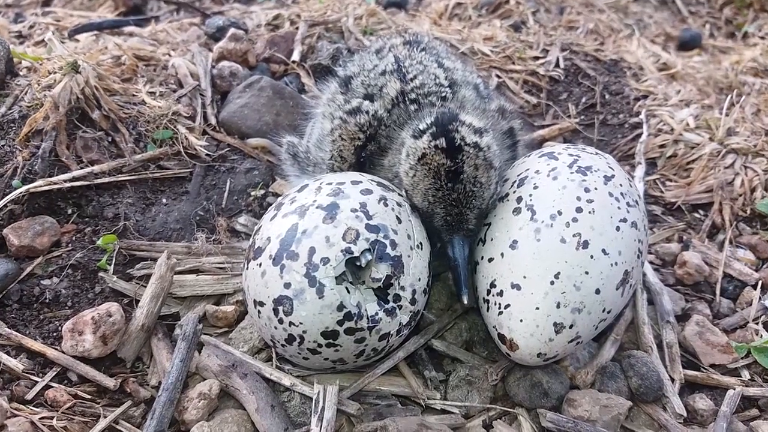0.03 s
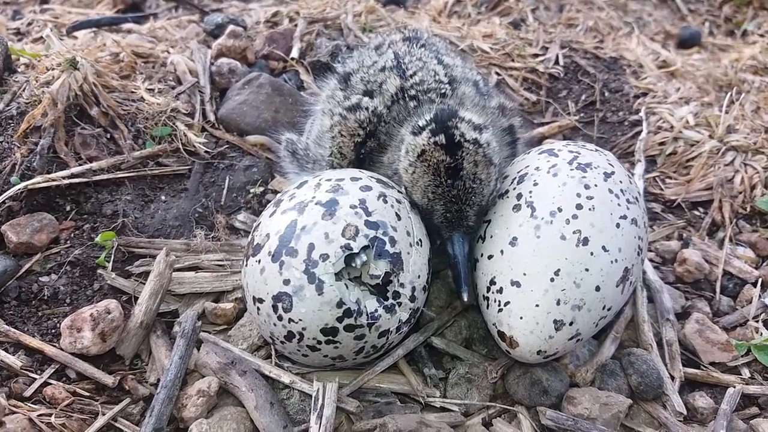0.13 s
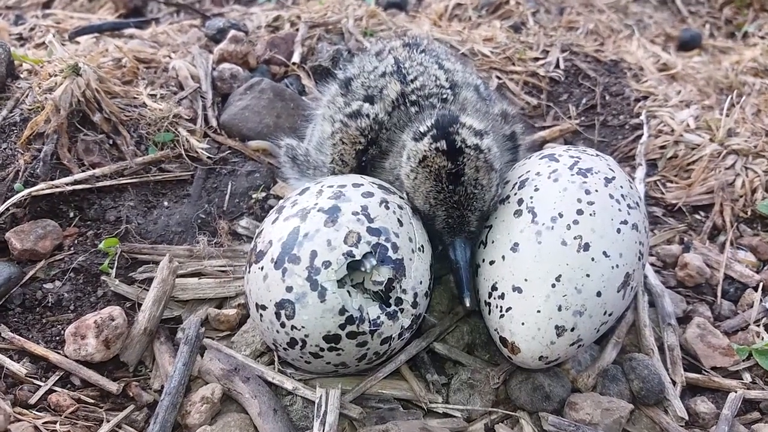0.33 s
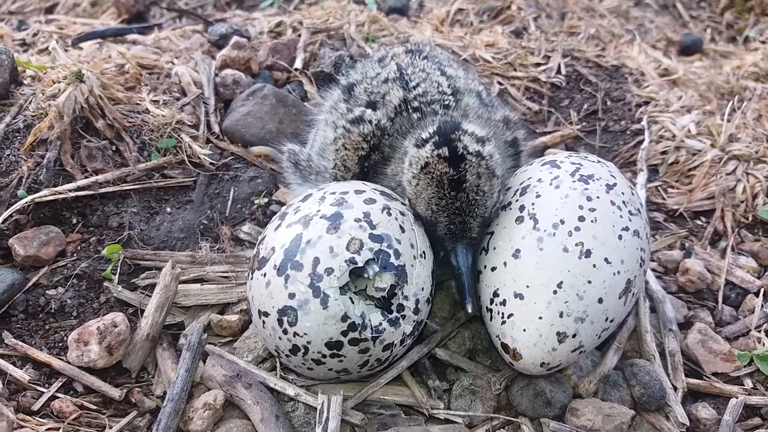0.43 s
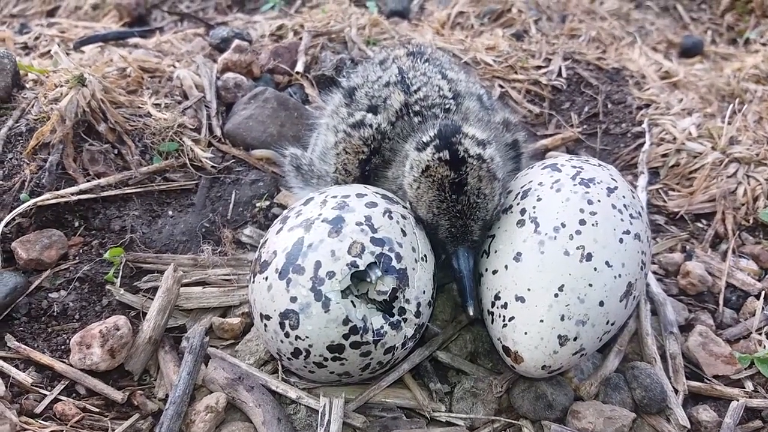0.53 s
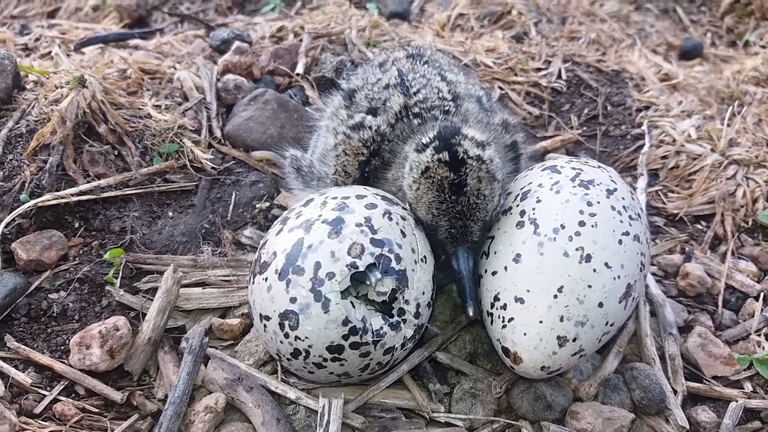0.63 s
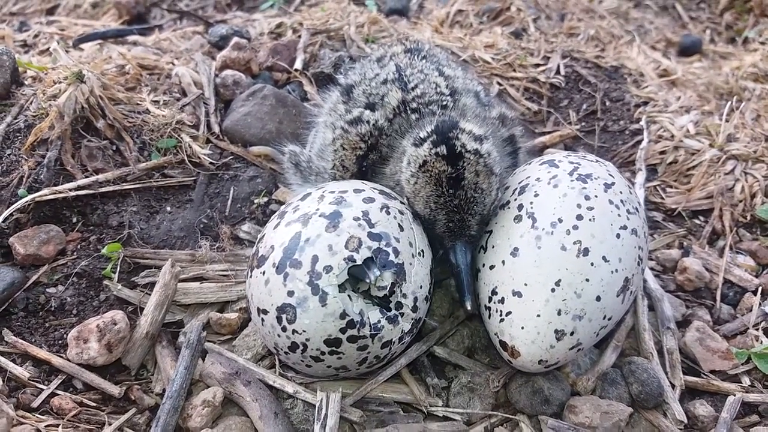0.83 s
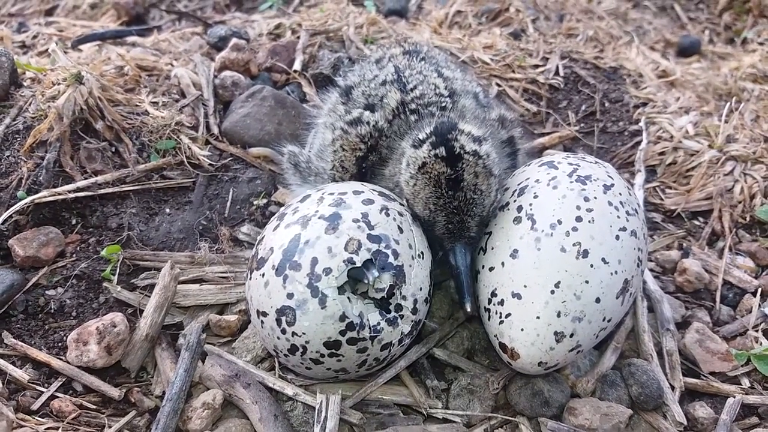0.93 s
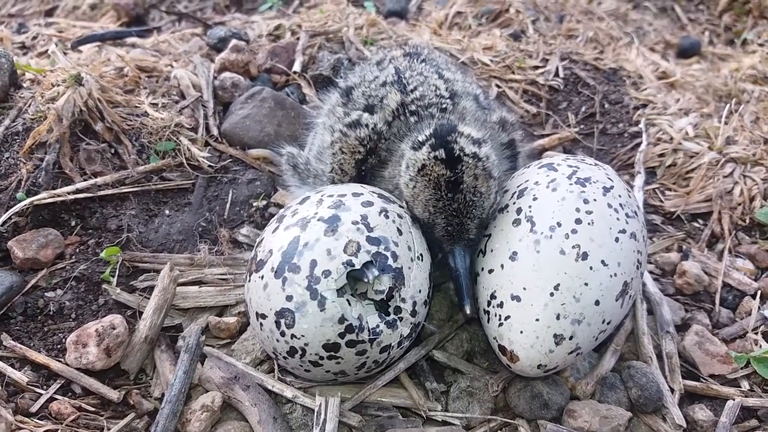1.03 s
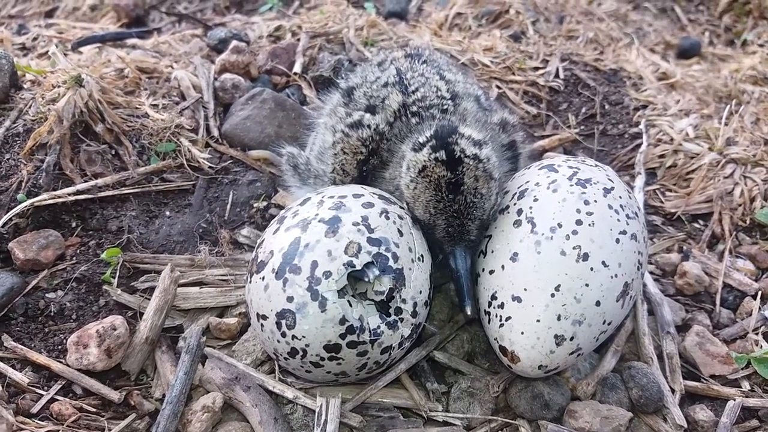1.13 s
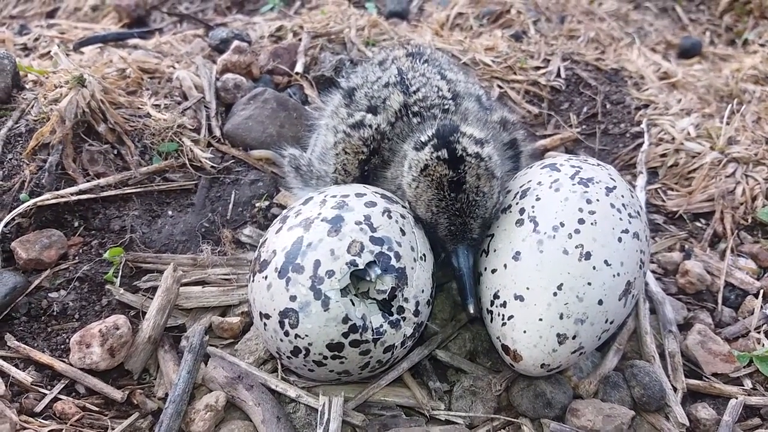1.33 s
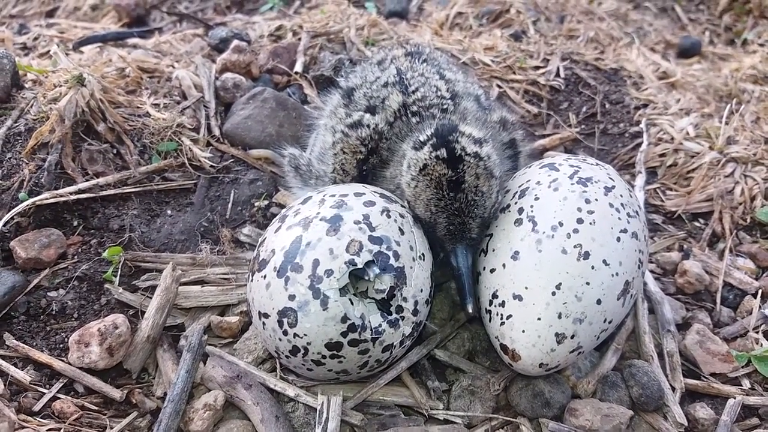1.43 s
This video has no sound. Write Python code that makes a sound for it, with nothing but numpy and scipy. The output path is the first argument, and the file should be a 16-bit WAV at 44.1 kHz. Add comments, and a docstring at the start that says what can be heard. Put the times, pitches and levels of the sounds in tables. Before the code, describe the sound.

A chick peeps close by at about 0.2 seconds, a short clear whistle that rises and falls. A tiny dry tick follows at 0.4 seconds, then a faint distant chirp at 0.5. From 0.8 to 0.95 seconds the chick gives a higher, hoarse peep that cracks downward. Low wind rumbles on the microphone throughout, with soft thumps and very faint far twittering, until about 1.5 seconds.

```python
"""Wader chick in a windy field

A chick peeps twice at its nest, close by: a clear arched whistle, then a higher, hoarse one that cracks.
Its syrinx makes the tones, buzz and rasp; throat, beak and the ground reflection colour them.
Wind buffets the microphone over the hush of an open field; birds chirp far off and a dry stalk ticks."""
import sys
import numpy as np
from scipy import signal
from scipy.fft import rfft, irfft
from scipy.io import wavfile
from scipy.ndimage import uniform_filter1d

SR = 44100
rng = np.random.default_rng(int(sys.argv[2]) if len(sys.argv) > 2 else 0)


def generate_wav(signal):
    """Clip the signal to [-1, 1] and save it as 16-bit WAV at the path in sys.argv[1]."""
    frames = np.transpose(np.atleast_2d(signal))
    scaled = np.clip(frames, -1, 1) * 32767
    pcm = np.round(scaled).astype(np.int16)
    wavfile.write(sys.argv[1], SR, pcm)


N = 66150
T = np.arange(N) / SR
HZ = np.fft.rfftfreq(N, 1 / SR)

# EQ of throat, beak and the sharply notched ground reflection: f/Hz, gain/dB
BEAK_EQ = [(200, -51), (600, -17.5), (1100, -16), (1500, -21.5), (2000, -20), (2350, -11), (2680, 0),
           (2850, -0.5), (2950, -5), (3005, -9.5), (3055, -33.5), (3125, -16), (3250, -14.5), (3500, -15),
           (4050, -22), (4700, -12), (5500, -14.5), (5790, -34.5), (5980, -16), (6200, -8), (7100, -14.5),
           (7900, -14.5), (8300, -16.5), (9400, -17), (10500, -18), (11500, -31.5), (15500, -39.5)]
def chick():
    """Whistles, broken by buzz and gritty rasp, leave through the beak and scatter off the ground."""
    throb, swing, buzz_tone = buzzes()
    voice = peep_whistles(swing) * (1 + throb) + buzz_tone
    spurts = unit(amp(1.5 * noise(bell(0, width_hz=232.6))))  # 1.5 dB rms of fast flutter
    grit = spurts * (ragged_note() + rasp())
    peeps = colour(voice + grit, BEAK_EQ)
    return peeps + amp(-29.5) * echo(peeps, t60_s=.063)


# The clear arch, the hoarse peep and its falling crack: t/s, f/Hz, level/dB, overtone boost/dB
CLEAR_NOTE = [(.181, 2271, -32, -3), (.195, 2307, -30.5, -3), (.205, 2650, -28.5, 0.5),
              (.211, 2690, -25, 2), (.218, 2870, -22, 4), (.232, 3035, -20.5, 2.5), (.246, 3090, -13.5, -3),
              (.26, 3139, -19, -3), (.276, 3084, -23, 2.5), (.29, 2976, -18.5, -1.5),
              (.304, 2822, -20.5, -4), (.3125, 2558, -22, 6), (.315, 2817, -24, -5.5),
              (.324, 2815, -22.5, -11), (.33, 2614, -29, 5), (.337, 2190, -33, 7)]
HOARSE_NOTE = [(.79, 3560, -35, -10), (.799, 4240, -41.5, 5), (.808, 4640, -38, -1), (.82, 4690, -37.5, -7),
               (.84, 4758, -31.5, -6), (.86, 4675, -33, -8), (.88, 4350, -26, -4.5), (.891, 3970, -30.5, 6),
               (.899, 3830, -32, 9), (.906, 3480, -26.5, -4), (.914, 3280, -34, -4)]
CRACK_NOTE = [(.913, 3000, -24.5, -9), (.92, 2780, -29, -8), (.924, 2610, -28.5, 1), (.929, 2440, -29, 1),
              (.937, 2247, -33, 1), (.946, 2000, -46, 1)]
# Harmonic mix of each note, from the fundamental up: level/dB
CLEAR_MIX = [-0.5, -14, -7.5, -13, -12.5]
HOARSE_MIX = [0.5, -9]
CRACK_MIX = [0, -7, -8.5, -26]
CLEAR_JITTER, HOARSE_JITTER = .0012, .0051  # rms fraction of the pitch
def peep_whistles(swing):
    """The syrinx sings a clean note, then a shakier one that cracks into a lower register."""
    return (whistle(CLEAR_NOTE, CLEAR_MIX, CLEAR_JITTER, swing)
            + whistle(HOARSE_NOTE, HOARSE_MIX, HOARSE_JITTER, swing)
            + whistle(CRACK_NOTE, CRACK_MIX, HOARSE_JITTER, swing))


def whistle(note, harmonics_db, jitter, swing):
    """One side of the syrinx: a gliding harmonic tone, its phase swung by the buzzes."""
    hz, level_db, boost_db = curves(note)
    angle = phase(hz, jitter) + swing
    tone = 0
    for k, db in enumerate(harmonics_db, 1):
        gain = amp(db + boost_db * (k > 1)) * (k * hz < SR / 2)
        tone = tone + gain * np.sin(k * angle)
    return np.sqrt(2) * tone * envelope(note, level_db)


# Bursts of buzz: start/s, end/s, f/Hz, throb/0-1, swing/rad, shake/rad, level/dB, jitter/0-1
BUZZ_BURSTS = [(0.182, 0.206, 1166, 0.3, 0.089, 0.17, -38, 0.05),
               (0.311, 0.325, 930, 0, 0.21, 0.06, -43.5, 0.1),
               (0.792, 0.838, 1198, 0, 0.043, 0.036, -39, .1),
               (.886, 0.92, 1061, 0.12, 0.19, 0.84, -30, 0.1),
               (0.905, 0.937, 1190, 0.08, 0.053, 0.094, -38.5, 0)]
def buzzes():
    """A second, slower vibration throbs the whistle's level, swings its phase and adds its own tone."""
    throb = swing = tone = 0
    for start, end, hz, depth, swing_rad, shake_rad, db, jitter in BUZZ_BURSTS:
        burst = gate(start, end)
        buzz = burst * np.sin(phase(hz, jitter))
        shake = burst * noise(bell(0, width_hz=220.5))
        throb = throb + depth * buzz
        swing = swing + swing_rad * buzz + shake_rad * shake
        tone = tone + np.sqrt(2) * amp(db) * buzz
    return throb, swing, tone


# Fader ride of the ragged note: t/s, level/dB
RAGGED_RIDE = [(.79, -52.5), (.805, -64), (.815, -49.5), (.85, -45), (.9, -40.5), (.912, -44)]
def ragged_note():
    """The other side of the syrinx holds a rough note under the hoarse peep."""
    tone = np.sqrt(2) * np.sin(phase(hz=2760, jitter=.04))
    return envelope(RAGGED_RIDE, *curves(RAGGED_RIDE)) * tone


# Fader ride of the rasp in each peep: t/s, level/dB
CLEAR_RASP_RIDE = [(.182, -34), (.203, -48), (.225, -60.5), (.306, -64.5), (.315, -42.5), (.324, -33.5),
                   (.337, -64.5)]
HOARSE_RASP_RIDE = [(.79, -43), (0.804, -42), (0.813, -32), (.875, -31), (.9, -32), (0.92, -30.5),
                    (0.932, -38.5), (0.948, -52)]
# Tone of the rasp ahead of the beak: f/Hz, gain/dB
RASP_EQ = [(400, -11), (1100, -0.5), (2200, 2), (3200, -5), (4000, -4), (5200, -4), (6200, 5), (6900, -1),
           (8500, -11), (12000, -13.5), (15500, -12.5)]
def rasp():
    """Turbulent breath roughens the edges of the clear peep and all of the hoarse one."""
    return sum(envelope(ride, *curves(ride)) * noise(spectrum(RASP_EQ, HZ))
               for ride in (CLEAR_RASP_RIDE, HOARSE_RASP_RIDE))


# Fader ride of the gusts: t/s, level/dB
GUST_RIDE = [(0, -45.5), (.06, -45.5), (.09, -58.5), (.125, -41.5), (.17, -67), (.238, -42), (.3, -49.5),
             (.342, -65), (.445, -50), (.51, -59), (.56, -42), (.63, -51.5), (.76, -38.5), (.8, -42),
             (.83, -38.5), (.885, -58.5), (.98, -49), (1.06, -49), (1.1, -42.5), (1.125, -45.5),
             (1.17, -42.5), (1.29, -44), (1.335, -65), (1.402, -50.5), (1.5, -63)]
# Bass-heavy tone of the rumble: f/Hz, gain/dB
RUMBLE_EQ = [(22, -51), (38, -18.5), (58, 6.5), (90, 3.5), (150, -5), (210, -17), (300, -26.5),
             (500, -42.5), (1500, -50), (4000, -76.5)]
# Single eddies, ahead of the low cut: t/s, width/s, level/dB
EDDY_HITS = [(.702, 0.0014, -27.5), (.749, 0.001, -26.5), (0.762, 0.0012, -23.5), (.817, 0.0014, -26.5),
             (.998, 0.0018, -22.5), (1.031, 0.0015, -24), (1.089, 0.0015, -28), (1.169, 0.0015, -26.5),
             (1.203, 0.0014, -24.5)]
def wind():
    """Gusts rumble, and the pressure bumps of eddies thump through the microphone's low cut."""
    bumps = sum(amp(db) * np.exp(-.5 * ((T - at) / width) ** 2) for at, width, db in EDDY_HITS)
    low_cut = signal.butter(N=4, Wn=61.4, btype="high", fs=SR, output="sos")
    rumble = amp(*curves(GUST_RIDE)) * noise(spectrum(RUMBLE_EQ, HZ))
    return signal.sosfilt(low_cut, bumps) + rumble


# One small, distant chirp: t/s, f/Hz, level/dB
CHIRP_NOTE = [(.46, 2745, -69), (.472, 2930, -65.5), (.475, 3510, -54.5), (.486, 3540, -58),
              (.498, 3466, -57.5), (.506, 3000, -61)]
# Smears of twitter from further off: centre/s, length/s, f/Hz, width/Hz, level/dB
TWITTER_SMEARS = [(0.768, 0.075, 4720, 161.4, -76), (1.025, 0.31, 4810, 175, -74),
                  (1.239, 0.027, 5100, 375, -63.5)]
def far_birds():
    """A chirp whose top note lingers in the echo, and twitter blurred to narrow bands of noise."""
    pitch_hz, level_db = curves(CHIRP_NOTE)
    chirp = np.sqrt(2) * envelope(CHIRP_NOTE, level_db) * np.sin(phase(pitch_hz, CLEAR_JITTER))
    tail = irfft(rfft(echo(chirp, t60_s=.32)) * bell(3450, width_hz=170), N)
    twitter = 0
    for centre, length, hz, width, db in TWITTER_SMEARS:
        swell = amp(db) * np.exp(-(2 * (T - centre) / length) ** 2)
        twitter = twitter + swell * noise(bell(hz, width))
    return chirp + amp(-6) * tail + twitter


# Brittle tone of the tick: f/Hz, gain/dB
STALK_EQ = [(1000, -15), (2500, -3), (4200, 1), (5400, -6), (7500, 0), (10000, -12), (15000, -20)]
def stalk(at_s=.3975, level_db=-49.5, decay_s=.0009):
    """A dry stalk in the nest gives one tiny tick of noise."""
    decay = (T >= at_s) * np.exp(-abs(T - at_s) / decay_s)
    return amp(level_db) * decay * noise(spectrum(STALK_EQ, HZ))


# Tone of the ambience bed: f/Hz, gain/dB
HUSH_EQ = [(30, -13.5), (120, -4.5), (250, 2), (520, -1), (950, -7), (1500, -10), (2800, -13.5),
           (4000, -16), (4700, -13), (5600, -19.5), (15000, -16)]
# Its gentle swell and sink: t/s, gain/dB
HUSH_RIDE = [(0, -1), (.4, 0), (.7, -0.5), (1.15, 2), (1.5, -2)]
def hush(level_db=-64):
    """The open field lays a soft, broadband bed of noise under everything."""
    return amp(level_db) * amp(*curves(HUSH_RIDE)) * noise(spectrum(HUSH_EQ, HZ))


def amp(db):
    """Decibels to gain."""
    return 10 ** (np.asarray(db) / 20)


def unit(x):
    """Scales to rms 1."""
    return x / np.sqrt(np.mean(x ** 2) + 1e-20)


def spectrum(eq, hz):
    """Gain of an EQ table at the given frequencies."""
    f, db = np.transpose(eq)
    return amp(np.interp(np.log(hz + 1), np.log(f + 1), db))


def noise(gain):
    """Noise shaped by a gain per frequency, at rms 1."""
    return unit(irfft(rfft(rng.standard_normal(N)) * gain, N))


def bell(hz, width_hz):
    """A smooth band around hz."""
    return np.exp(-.5 * ((HZ - hz) / width_hz) ** 2)


def gate(start, end, attack_s=.00196, release_s=.003):
    """Opens at start and is shut by end, with short fades."""
    return np.clip((T - start) / attack_s, 0, 1) * np.clip((end - T) / release_s, 0, 1)


def curves(table):
    """The columns of a timed table as slightly rounded automation curves."""
    times, *columns = np.transpose(table)
    return [uniform_filter1d(np.interp(T, times, column), size=130) for column in columns]


def envelope(table, db):
    """A level gated to the table's time span."""
    return amp(db) * gate(table[0][0], table[-1][0])


def phase(hz, jitter):
    """Phase of an oscillator whose pitch trembles."""
    tremble = jitter * noise(bell(0, width_hz=464.6))
    return 2 * np.pi * np.cumsum(hz * (1 + tremble)) / SR


def colour(x, eq, size=8192):
    """Plays x through a causal filter drawn from an EQ table."""
    log_gain = np.log(spectrum(eq, abs(np.fft.fftfreq(size, 1 / SR))))
    response = np.fft.ifft(np.exp(np.conj(signal.hilbert(log_gain)))).real
    return signal.fftconvolve(x, response[:size // 2])[:N]


def echo(x, t60_s):
    """Diffuse scatter from the open ground."""
    tail = rng.standard_normal(N) * np.exp(-np.log(1000) * T / t60_s)
    return signal.fftconvolve(x, tail / np.linalg.norm(tail))[:N]


def scene():
    """The chick, the wind and the field around them, mixed in mono."""
    return (chick() + wind() + far_birds() + stalk() + hush())[None]


def record(dry, cutoff_hz=15520):
    """A steep high cut trims the very top of the mix."""
    high_cut = signal.firwin(1023, cutoff_hz, window=("kaiser", 9), fs=SR)
    return signal.oaconvolve(dry, high_cut[None], "same")


dry = scene()
out = record(dry)
generate_wav(out)
```